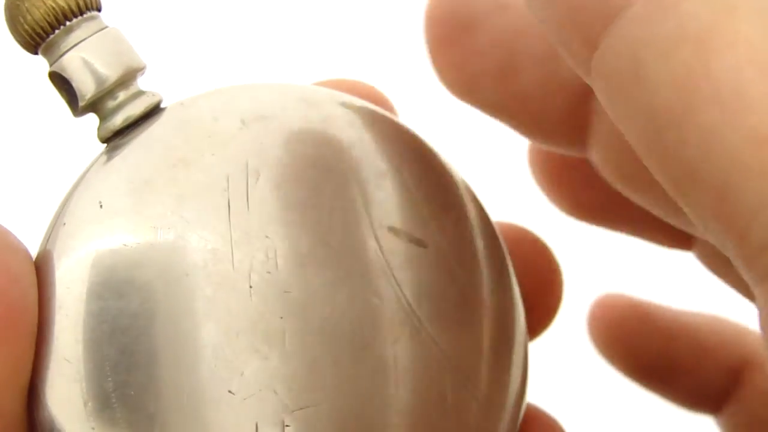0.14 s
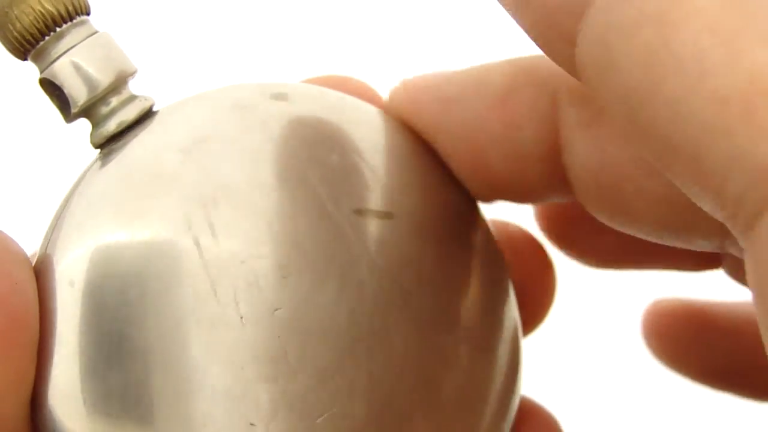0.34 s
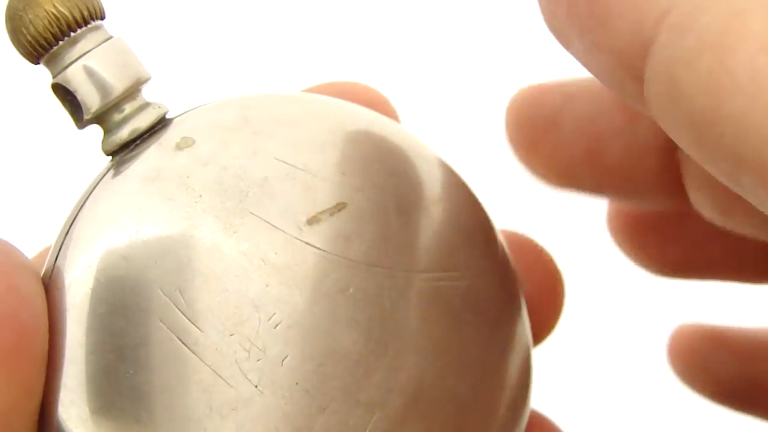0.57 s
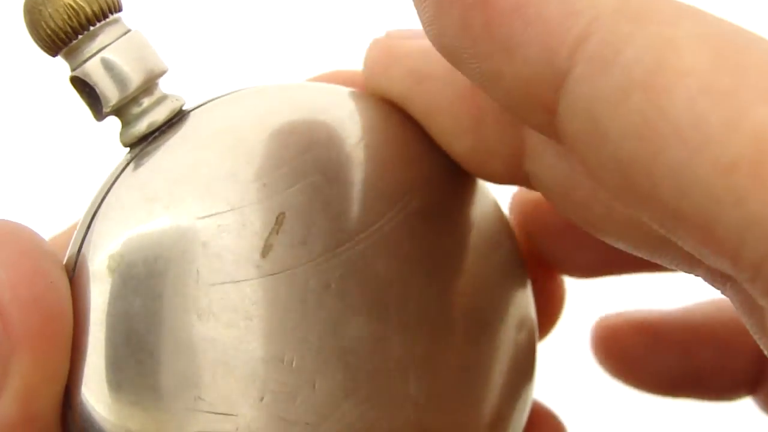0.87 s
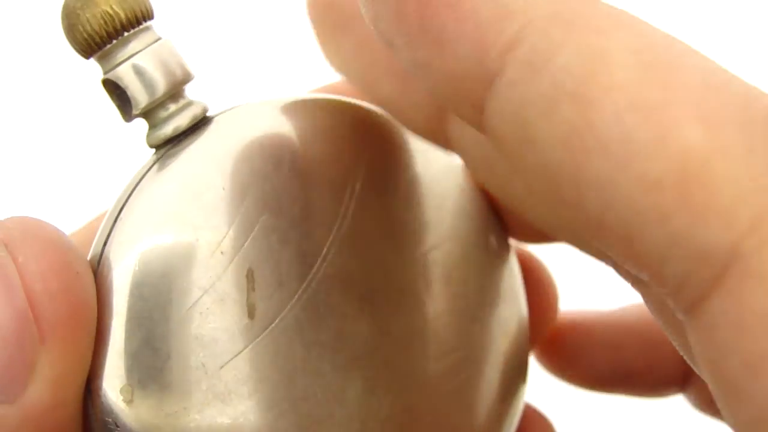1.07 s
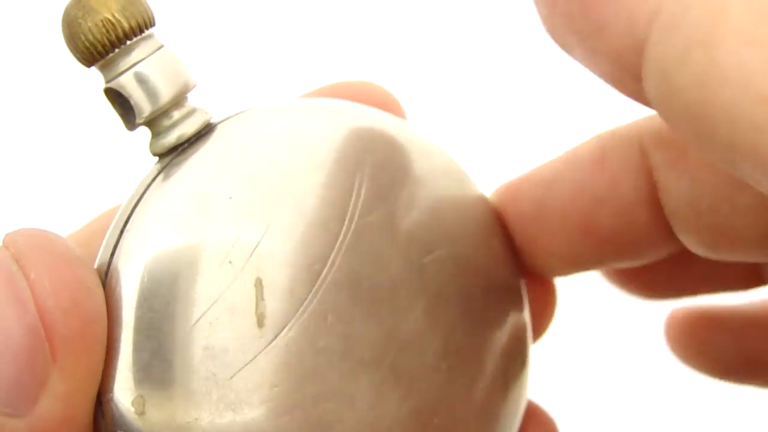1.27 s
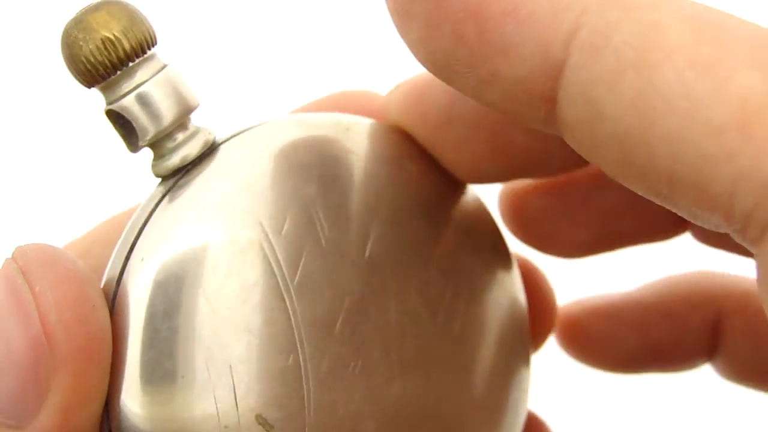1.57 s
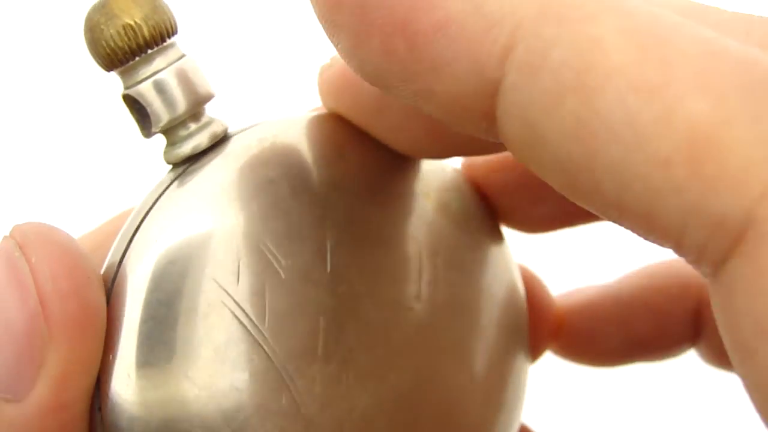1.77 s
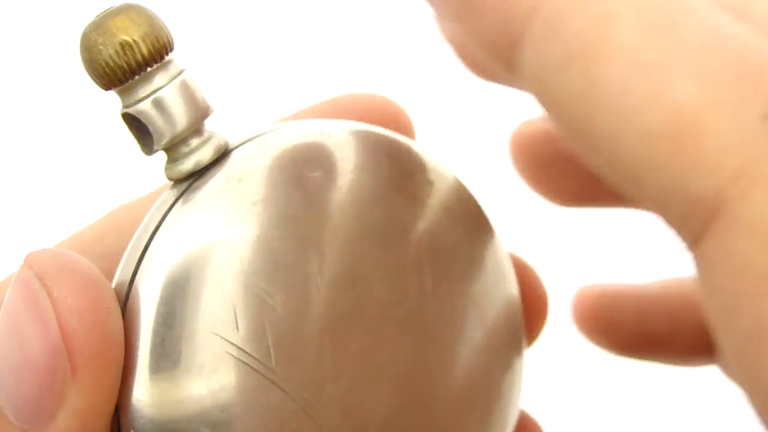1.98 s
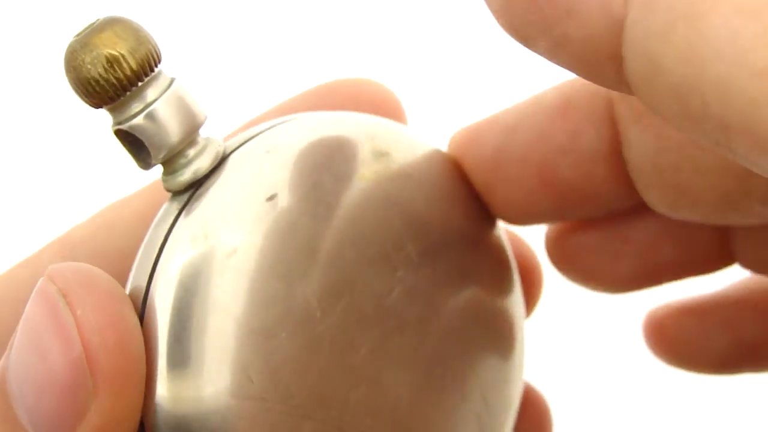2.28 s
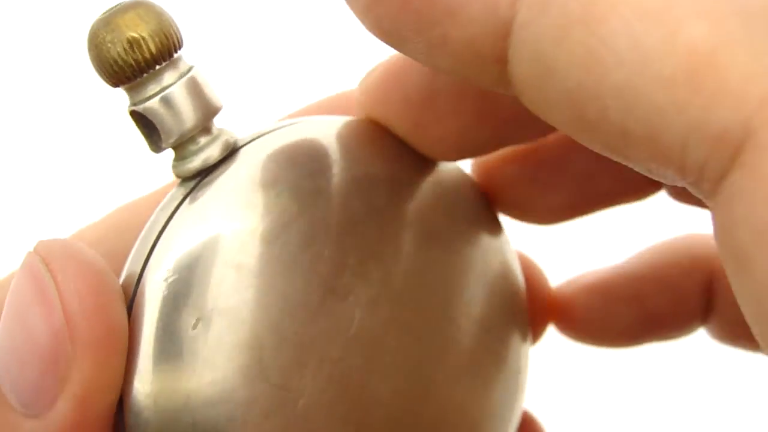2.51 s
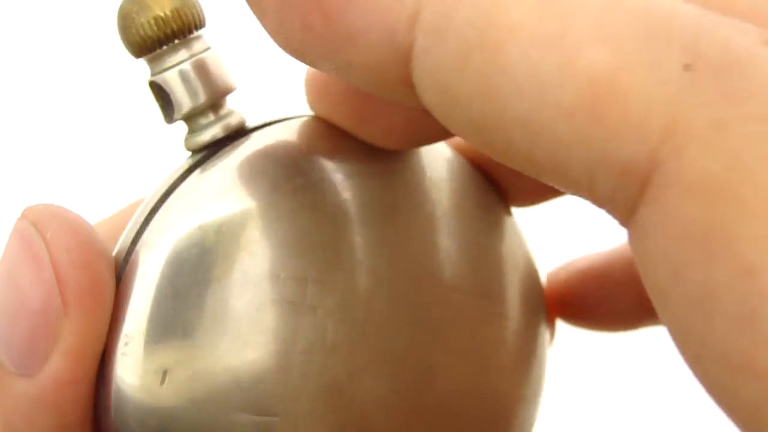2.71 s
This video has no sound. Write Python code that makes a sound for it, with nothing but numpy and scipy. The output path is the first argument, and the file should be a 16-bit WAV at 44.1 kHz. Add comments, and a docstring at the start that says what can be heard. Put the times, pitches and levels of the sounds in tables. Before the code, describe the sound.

Close up in a quiet room, a fingernail rasps along the seam of a hand-held pocket watch, try after try, with small, hollow metal clicks. It finally slips off the lip in a louder snap, and the lid rings briefly.

```python
"""Fingernails pry at the rim of a hand-held pocket watch case, close up in a quiet room.
Try after try, a nail scrapes grittily along the seam, clicking where it catches and lets go;
the hollow case answers with short tones, damped by the fingers.
Near the end a nail snaps off the lip and the lid rings briefly."""
import sys
import numpy as np
from scipy import signal
from scipy.fft import rfft, irfft
from scipy.io import wavfile

SR = 44100
rng = np.random.default_rng(int(sys.argv[2]) if len(sys.argv) > 2 else 0)


def output_pcm(signal):
    """Save a mono or channel-first signal as 16-bit PCM at the path in sys.argv[1].

    Samples are clipped to [-1, 1] before scaling.
    """
    pcm = np.clip(np.atleast_2d(signal).T, -1, 1) * 32767
    wavfile.write(sys.argv[1], SR, np.round(pcm).astype(np.int16))


N = 125685
HZ = np.fft.rfftfreq(N, 1 / SR)

# Five bands of the nail's force (hollow thud, knock, clack, tick, bright ping): f/Hz
FORCE_BANDS_HZ = (600, 1300, 2300, 4700, 9300)
# Modes of the finger-damped case: f/Hz; then for each, level/dB, t60/s
CASE_HZ = (568, 625, 725, 1275, 1345, 1760, 1962, 2140, 2272, 2358, 2854, 3080, 4640, 4735, 7050, 9305,
           10280)
CASE_MODES = [(8, .035), (-3, 0.031), (-4, 0.031), (0.5, 0.027), (-2.5, 0.037), (2, 0.033), (-2, 0.027),
              (-1, 0.028), (3, 0.019), (-2, 0.018), (-5, 0.028), (1, 0.017), (2.5, 0.016), (3.5, 0.028),
              (-6, 0.014), (-8.5, 0.058), (-9, 0.0083)]
# Modes of the freely ringing lid: f/Hz; then for each, level/dB, t60/s
LID_HZ = (4930, 6709, 6880, 9240, 9300)
LID_MODES = [(0.5, 0.067), (-6, 0.08), (-3.5, 0.089), (-14, .05), (-15.5, .1)]


def amp(db):
    """Decibels to gain."""
    return 10 ** (np.asarray(db) / 20)


def unit(x):
    """Scales to an rms of one."""
    return x / np.sqrt(np.mean(x ** 2) + 1e-20)


def curve_db(curve, hz):
    """Reads an EQ curve (f/Hz, level/dB) on a log-frequency axis."""
    f, db = np.transpose(curve)
    return np.interp(np.log(hz + 1), np.log(f), db)


def colour(x, curve):
    """Filters a sound through an EQ curve."""
    return irfft(rfft(x) * amp(curve_db(curve, np.fft.rfftfreq(len(x), 1 / SR))), len(x))


def wander(corner_hz):
    """Smooth random modulation with an rms of one."""
    return unit(irfft(rfft(rng.standard_normal(N)) / (1 + (HZ / corner_hz) ** 2), N))


def add(mix, start_s, sound):
    """Mixes a sound in at a time."""
    part = mix[max(round(start_s * SR), 0):][:len(sound)]
    part += sound[:len(part)]


def ring(hz, modes, force_db, contact_s):
    """Dying sines, each driven by its own force and swelling during the contact."""
    db, t60 = np.transpose(modes)[:, :, None]
    t = np.arange(SR // 5) / SR
    envelopes = amp(db + np.reshape(force_db, (-1, 1))) * np.exp(-np.log(1000) * t / t60)
    sines = envelopes * np.sin(2 * np.pi * np.outer(hz, t))
    return sines.sum(0) * (1 - np.exp(-t / contact_s))


def case_ring(band_db, contact_s, spot_db=0):
    """The hollow case rings, its modes driven by the force in five bands."""
    force_db = curve_db(list(zip(FORCE_BANDS_HZ, band_db)), np.array(CASE_HZ))
    return ring(CASE_HZ, CASE_MODES, force_db + spot_db, contact_s)


def nail_catches(crunch_db=3, crunch_t60_s=0.025, spot_spread_db=1.8):
    """Each catch crunches, strikes the case at a slightly different spot and rings the lid."""
    # Catches: t/s, thud/dB, knock/dB, clack/dB, tick/dB, ping/dB, lid ring/dB, contact time/s
    catches = [ (.011, -38, -38, -48, -52.5, -53, -72, 0.00022),
               (0.0817, -38, -42, -54, -44, -45, -68, 0.0017),
               (0.0927, -44, -42, -46, -37, -49, -64, 0.00063),
               (.1025, -36, -44, -43, -53, -53, -68, 0.0014), (.1135, -53, -54, -36, -69, -54, -57, .001),
               (.3285, -45, -48, -58, -68, -70, -75, 0.00085), (.364, -49, -36, -56, -47, -58, -60, 0.0012),
               (.372, -41.5, -50, -50, -58, -56, -66, 0.0015), (.38, -50, -43, -48, -46, -56, -46, 0.0011),
               (.391, -44, -34.5, -56, -49, -58, -45, 0.00091),
               (.419, -49.5, -34, -49, -58, -55, -60, 0.00017),
               (0.441, -36.5, -42, -38, -52, -47, -57, 0.001), (.716, -44, -52, -65, -58, -72, -75, .001),
               (.74, -49, -41, -39, -74, -62, -70, 0.0014), (.752, -44, -38, -38.5, -60, -66, -70, 0.0025),
               (0.7612, -46.5, -46, -49, -49, -58, -71, .0008), (.78, -52, -47, -51, -56, -67, -70, 0.0011),
               (1.042, -51, -60, -39, -60, -60, -70, .002), (1.057, -45, -41, -46, -65, -62, -70, 0.0026),
               (1.075, -58, -63, -46, -53, -54, -62, .001),
               (1.343, -42.5, -59, -41.5, -52, -68, -72, 0.0028),
               (1.3805, -43, -54, -40.5, -37.5, -53, -56, 0.00089),
               (1.493, -37, -47.5, -41, -51, -64, -72, 0.00043),
               (1.5055, -41, -39.5, -48.5, -40, -47.5, -65, 0.00039),
               (1.6375, -39, -38, -37.5, -54, -66, -74, 0.0039),
               (1.713, -61, -50, -47.5, -50, -66, -75, 0.00082),
               (1.748, -39, -53, -58, -62, -70, -75, 0.0028), (1.756, -36, -50, -46, -62, -70, -75, 0.0035),
               (1.768, -38, -51, -45, -67, -70, -75, 0.0035),
               (1.778, -26.5, -42, -44.5, -54, -67, -75, 0.0018),
               (1.819, -39.5, -45, -40, -74, -68, -72, 0.0025),
               (1.828, -41, -47, -50, -69, -68, -74, 0.0016),
               (1.866, -49.5, -58, -47, -61, -70, -72, 0.0018),
               (1.9055, -44.5, -53, -48.5, -61, -68, -72, 0.00095),
               (1.962, -37.5, -72, -47, -54, -57, -72, 0.0014),
               (1.966, -35, -32.5, -38, -30.5, -35, -56, 0.00072),
               (2.2553, -44.5, -41.5, -41, -46, -48, -48.5, 0.00062),
               (2.2759, -35, -51, -52, -50, -64, -70, 0.0013),
               (2.4003, -42, -47, -32.5, -66, -62, -66, 0.002),
               (2.588, -52, -56, -35, -38.5, -46, -58, 0.0018),
               (2.6014, -45, -52, -40, -48, -49, -62, 0.00061),
               (2.606, -32.5, -28, -24, -22, -35, -48, 0.00046),
               (2.6094, -21.5, -26.5, -17.5, -35, -38, -36, 0.00098),
               (2.616, -35.5, -39, -25, -40, -52, -28.5, 0.0013),
               (2.6215, -31.5, -29, -33.5, -22.5, -33, -28, 0.0011),
               (2.626, -30, -28.5, -22.5, -44, -44, -57, 0.0011),
               (2.636, -40.5, -31.5, -51, -33, -56, -64, 0.00083),
               (2.642, -44, -35.5, -53, -54, -64, -65, 0.00057),
               (2.7542, -65, -47.5, -46, -45.5, -55, -44, 0.00063)]
    # Crunch of the nail's edge: f/Hz, level/dB
    crunch_eq = [(60, -32), (300, -22), (430, -21), (580, -8), (950, -9), (1310, 2), (1520, -11), (1780, 8),
                 (2050, -4), (2330, 0.5), (2650, -4), (3080, 4.5), (3900, -8.5), (4700, 1), (5300, -5),
                 (6100, -11), (7200, -3), (8300, -11.5), (10300, -0.5), (11000, -17)]
    out, t = np.zeros(N), np.arange(SR // 5) / SR
    for start_s, *band_db, lid_db, contact_s in catches:
        spot_db = spot_spread_db * rng.standard_normal(len(CASE_MODES))
        crunch = unit(colour(rng.standard_normal(len(t)), crunch_eq))
        crunch = colour(crunch, list(zip(FORCE_BANDS_HZ, band_db)))
        envelope = np.exp(-np.log(1000) * t / crunch_t60_s) * (1 - np.exp(-t / contact_s))
        case = case_ring(band_db, contact_s, spot_db)
        lid = ring(LID_HZ, LID_MODES, lid_db, contact_s)
        add(out, start_s, amp(crunch_db) * crunch * envelope + case + lid)
    return out


def slip_grains(per_s=12000, spread_db=2):
    """Friction as dense tiny slips of uneven size."""
    size = amp(spread_db * np.minimum(rng.exponential(1, N), 5))
    return size * rng.choice([-1, 1], N) * (rng.random(N) < per_s / SR)


def seam_scrapes(stick_db=2.56, stick_hz=128, contact_s=0.0013):
    """The sliding nail rasps and fizzes in uneven spurts and keeps case, lid and rim sounding."""
    # One envelope for each stroke along the seam: t/s, rasp/dB, fizz/dB
    strokes = [
        [(.02, -57, -72), (.036, -46.5, -53), (.068, -50, -46.5), (.092, -46, -47.5), (.124, -45, -49),
         (.14, -65, -78)],
        [(.325, -70, -76), (.352, -51.5, -54), (.366, -46.5, -59), (.389, -43, -65), (.403, -53, -52),
         (.416, -52.5, -53.5), (.452, -52, -60), (.47, -57.5, -65), (.515, -55.5, -75)],
        [(.712, -67, -72), (.745, -51, -63), (.80, -51, -68), (.85, -49.5, -67), (.90, -55, -70),
         (.97, -56, -69), (1.004, -51, -61), (1.075, -52, -65), (1.095, -70, -77)],
        [(1.32, -58, -77), (1.376, -58, -57.5), (1.41, -49.5, -59), (1.43, -46.5, -62), (1.455, -53, -57.5),
         (1.475, -49.5, -61), (1.515, -70, -75), (1.54, -52, -66), (1.58, -61, -76)],
        [(1.58, -55, -72), (1.622, -50.5, -75), (1.68, -52, -71), (1.722, -56.5, -64), (1.762, -60, -80),
         (1.80, -62, -77), (1.816, -55.5, -71), (1.90, -54.5, -70), (1.935, -74, -81)],
        [(2.21, -59, -76), (2.246, -57.5, -62), (2.295, -56.5, -69), (2.322, -48.5, -68), (2.37, -53, -62),
         (2.445, -53.5, -62), (2.49, -55, -65), (2.555, -51.5, -58), (2.58, -60, -70), (2.592, -45, -55),
         (2.604, -59, -75)],
    ]
    # Friction noise, a midrange rasp and a bright fizz: f/Hz, level/dB
    rasp_eq = [(150, -26), (600, -20), (1000, -9), (1300, -5.5), (1520, -31), (1780, 8.5), (2000, -4.5),
               (2350, 7.5), (2700, 0), (3300, 1.5), (3900, -7.5), (4400, -1), (4750, 0.5), (5200, -0.5),
               (6200, -11), (7000, -5), (8000, -10.5), (11000, -31)]
    fizz_eq = [(100, -40), (4000, -25), (6300, 2), (8200, -14), (8900, -1), (9300, 8.5), (9800, -1),
               (10350, 1.5), (11000, -5)]
    # Friction's drive on the case in the five force bands: level/dB
    friction_db = (0.5, -1, -6, 0.5, -8)
    t, rasp_level, fizz_level = np.arange(N) / SR, np.zeros(N), np.zeros(N)
    for stroke in strokes:
        times, rasp_db, fizz_db = np.transpose(stroke)
        sliding = (t >= times[0]) & (t < times[-1])
        rasp_level += sliding * amp(np.interp(t, times, rasp_db))
        fizz_level += sliding * amp(np.interp(t, times, fizz_db))
    spurts = amp(stick_db * wander(stick_hz))
    slips = unit(slip_grains() * spurts)
    rasp = amp(-2.5) * rasp_level * unit(colour(slips, rasp_eq))
    fizz = amp(2) * fizz_level * unit(colour(slip_grains() * spurts, fizz_eq))
    out = rasp + fizz + singing_rim(unit(slip_grains()) * rasp_level)
    case = case_ring(friction_db, contact_s)
    lid = ring(LID_HZ, LID_MODES, 0, contact_s)
    for body, db in (case, -6.5), (lid, -25):
        out += amp(db) * signal.fftconvolve(slips * rasp_level, body / np.linalg.norm(body))[:N]
    return out


def singing_rim(friction, swell_db=5.5, swell_hz=9):
    """Friction feeds narrow resonances of the rim, each swelling and fading at random."""
    # Rim resonances: f/Hz, width/Hz, level/dB relative to the friction
    resonances = [(4750, 230, -13.5), (6820, 220, -14.5), (7340, 300, -22), (10250, 230, -20)]
    out = np.zeros(N)
    for hz, width_hz, db in resonances:
        peak = unit(1 / (1 + (2 * (HZ - hz) / width_hz) ** 2))
        level = amp(db + swell_db * np.tanh(wander(swell_hz)))
        out += level * irfft(rfft(friction) * peak, N)
    return out


def room(x, tail_db=-22, t60_s=0.3, onset_s=0.0033):
    """Adds two close reflections and a faint short tail."""
    # Reflections off nearby surfaces: delay/s, gain
    echoes = [(.0019, 0.067), (.0043, 0.05)]
    t = np.arange(SR // 2) / SR
    tail = rng.standard_normal(len(t)) * np.exp(-np.log(1000) * t / t60_s) * np.minimum(t / onset_s, 1)
    response = amp(tail_db) * tail / np.linalg.norm(tail)
    for delay_s, gain in echoes:
        add(response, delay_s, np.array([gain]))
    return x + signal.fftconvolve(x, response)[:N]


def room_tone(level_db=-54.5):
    """A steady bed of room hush and microphone hiss."""
    # Colour of the hush: f/Hz, level/dB
    hush_eq = [(25, -25), (60, -16), (130, -7), (210, -2), (320, -3), (550, -2), (900, -4.5), (1800, -9.5),
               (3000, -12.5), (5000, -15), (8000, -18.5), (11000, -20.5)]
    return amp(level_db) * unit(colour(rng.standard_normal(N), hush_eq))


def scene(low_cut_hz=490):
    """Nails on a case too small to give off much bass, over the hush of the room."""
    hush = room_tone()
    low_cut = signal.butter(3, low_cut_hz, "high", fs=SR, output="sos")
    watch = signal.sosfilt(low_cut, nail_catches() + seam_scrapes())
    return (room(watch) + hush)[None]


def record(dry, high_cut_hz=11030):
    """A steep high cut takes off the top octave."""
    high_cut = signal.firwin(701, high_cut_hz, window=("kaiser", 8), fs=SR)
    return signal.oaconvolve(dry, high_cut[None], "same")


dry = scene()
out = record(dry)
output_pcm(out)
```